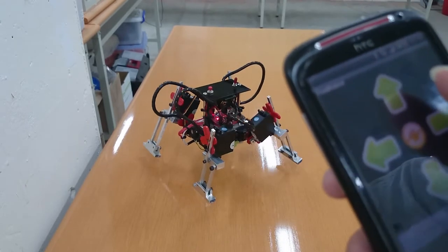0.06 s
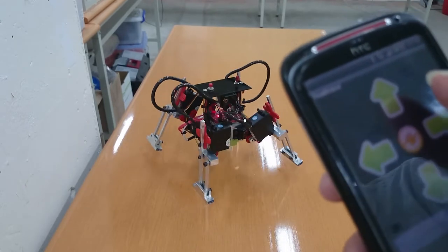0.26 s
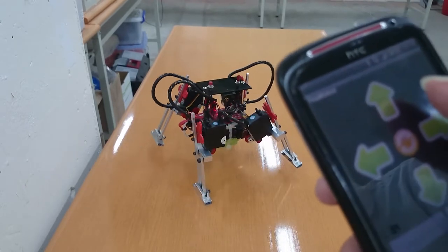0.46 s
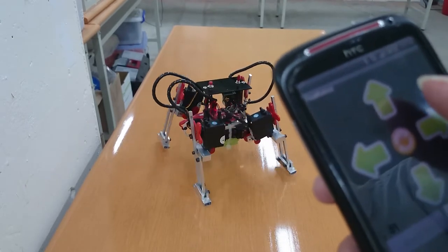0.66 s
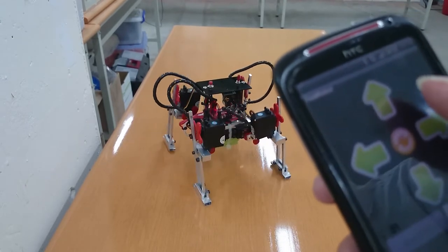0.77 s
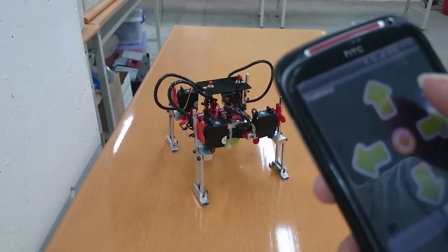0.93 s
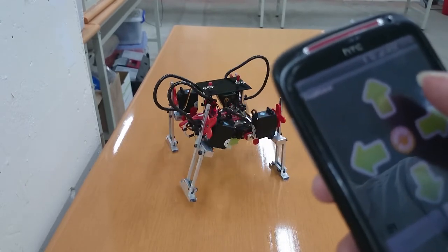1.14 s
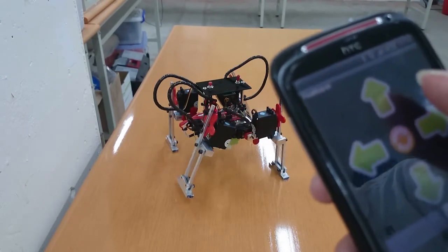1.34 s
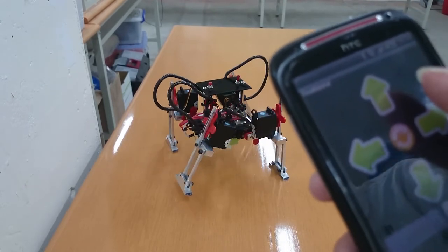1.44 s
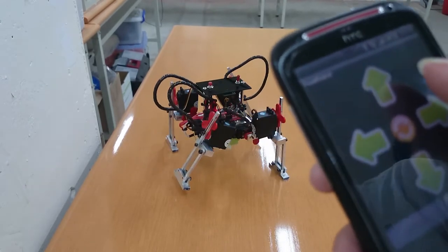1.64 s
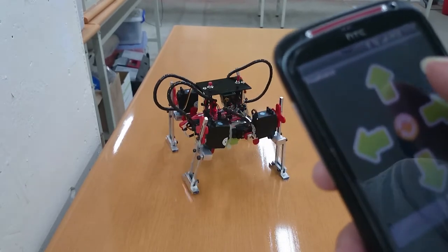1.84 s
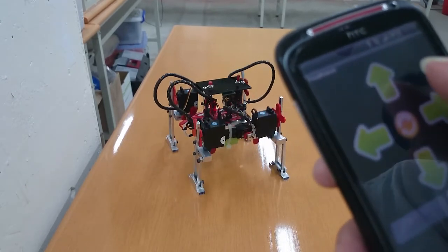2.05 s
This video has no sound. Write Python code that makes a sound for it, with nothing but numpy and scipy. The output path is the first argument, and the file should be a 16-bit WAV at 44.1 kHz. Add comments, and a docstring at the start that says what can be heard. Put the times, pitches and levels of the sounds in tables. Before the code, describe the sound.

Little walking robot's geared servos buzz in bursts, with a sharp foot clack on a tabletop and low air flutter

```python
"""A small walking robot on a tabletop, close by: servo gears rattle in surges, random tooth clicks
pulsed by the drive signal into resonances of body, gears, case and shell. Metal feet knock (noise
bursts and decaying rings) and drag (low noise). Moving air flutters in the right microphone port
(a gliding sine and rumble); a far machine hums under room noise, with a few faint short tones."""
import sys
import numpy as np
from scipy import signal
from scipy.fft import rfft, irfft
from scipy.io import wavfile
from scipy.ndimage import uniform_filter1d

SR = 44100
rng = np.random.default_rng(int(sys.argv[2]) if len(sys.argv) > 2 else 0)


def attenuation_scalar(level_db):
    """Turn a level in dB into a linear amplitude multiplier (20 dB per decade)."""
    decades = np.asarray(level_db, float) / 20
    return 10 ** decades


def unload_wav(signal):
    """Save mono or channel-first audio to the path in sys.argv[1] as 16-bit WAV at rate SR, clipped to [-1, 1]."""
    wavfile.write(
        sys.argv[1],
        SR,
        np.round(np.clip(np.atleast_2d(signal).T, -1, 1) * 32767).astype(np.int16),
    )


N = 92610


def evened(x):
    """Scales each channel to rms 1."""
    return x / np.sqrt(np.mean(x ** 2, -1, keepdims=True) + 1e-20)


def coloured(x, points):
    """Filters by a (Hz, dB) spectrum, interpolated over log frequency."""
    f, db = np.transpose(points)
    hz = np.fft.rfftfreq(x.shape[-1], 1 / SR)
    gain = attenuation_scalar(np.interp(np.log(hz + 1), np.log(f + 1), db))
    return irfft(rfft(x) * gain, x.shape[-1])


def slow(seconds, channels=1):
    """Random drift of rms 1: noise smoothed twice over a window of the given seconds."""
    size = max(int(seconds * SR), 1)
    noise = rng.standard_normal((channels, N))
    return evened(uniform_filter1d(uniform_filter1d(noise, size), size))


def resonate(x, hz, width_hz):
    """A steep resonance around hz, fixed or moving: shift down, smooth twice, shift back."""
    turn = np.exp(2j * np.pi * np.cumsum(hz * np.ones(N)) / SR)
    r = np.exp(-np.pi * width_hz / SR)
    return (turn * signal.lfilter([(1 - r) ** 2], [1, -2 * r, r ** 2], x / turn)).real


def reverb(x, t60_s):
    """Convolves with a decaying noise tail, partly alike in both ears."""
    alike = 0.3
    t = np.arange(SR // 2) / SR
    tail = rng.standard_normal((2, len(t))) * attenuation_scalar(-60 * t / t60_s) * (t > 0.006)
    tail = tail + alike * tail[::-1]
    return signal.fftconvolve(x, tail / np.linalg.norm(tail[0]), axes=1)[:, :N]


def bump(start_s, length_s):
    """A smooth rise and fall: half a sine period."""
    return np.sin(np.pi * np.clip((np.arange(N) / SR - start_s) / length_s, 0, 1))


def room_tone():
    """A far machine's wavering harmonics over broad, partly shared room noise."""
    # Each row: time in seconds, fundamental in Hz.
    hum_pitch = [(0, 41.2), (1.003, 43.49), (2.1, 44.82)]
    # Each row: multiple of the fundamental, mean rms level in dB.
    hum_orders = [(1, -59.5), (2, -57.5), (3, -59.5)]
    # Room noise spectrum. Each row: frequency in Hz, relative level in dB.
    air_colour = [(30, 16), (80, 1), (200, -4), (500, -6), (1000, -11), (2000, -29), (4000, -27.5),
                  (8000, -27), (12000, -41), (16000, -34.5)]
    # Room noise swell. Each row: time in seconds, level in dB relative to air_db.
    air_level = [(0, 11), (0.102, 3), (.5, -1.5), (0.999, 3), (1.55, 1), (1.75, 4), (2.1, 3.5)]
    waver_db, air_db, air_same = 2.5, -55, 0.41

    t = np.arange(N) / SR
    turns = np.cumsum(np.interp(t, *np.transpose(hum_pitch))) / SR
    waver = slow(0.052, channels=len(hum_orders))
    hum = np.zeros(N)
    for (k, db), w in zip(hum_orders, waver):
        hum += np.sqrt(2) * attenuation_scalar(db + waver_db * w) * np.sin(2 * np.pi * k * turns)

    a, b = rng.standard_normal((2, N))
    noise = np.array([a, air_same * a + np.sqrt(1 - air_same ** 2) * b])
    air = evened(coloured(noise, [(12, -1.5)] + air_colour))
    return hum + air * attenuation_scalar(air_db + np.interp(t, *np.transpose(air_level)))


def tones():
    """Faint steady-pitched sines swell and vanish."""
    # Each row: start in seconds, length in seconds, pitch in Hz, rms level at the crest in dB.
    tone_rows = [(0.73, 0.17, 57, -52), (1.69, 0.15, 554, -60), (1.65, .24, 720, -65),
                 (1.85, 0.077, 425, -59), (1.96, 0.085, 372, -59)]
    t = np.arange(N) / SR
    out = np.zeros(N)
    for start_s, length_s, hz, db in tone_rows:
        out += np.sqrt(2) * attenuation_scalar(db) * bump(start_s, length_s) * np.sin(2 * np.pi * hz * t)
    return out


def flutter():
    """Air at the right port: a deep gliding sine, with a lumpy rumble that follows its level."""
    # Each row: time in seconds, wobble pitch in Hz, relative level in dB.
    wobble_path = [(0.0, 21.5, -44.5), (0.152, 16.2, -36.5), (0.29, 21.7, -18), (0.478, 15.5, -30),
                   (0.539, 19.2, -27.5), (0.6, 26.2, -21.5), (0.642, 19.87, -22), (0.862, 22.2, -15.5),
                   (0.921, 22.2, -15.5), (1.091, 20.5, -27.5), (1.171, 18.5, -26.5), (1.3, 21.2, -36.5),
                   (1.359, 23.5, -21.5), (1.398, 22.8, -24.5), (1.442, 20.1, -41.5), (1.481, 20.6, -29),
                   (1.599, 16.3, -32), (1.651, 21.2, -47.5), (1.7, 22, -36), (1.869, 22.3, -35.5),
                   (1.95, 31, -47.5), (2.1, 23, -44.5)]
    # Rumble spectrum. Each row: frequency in Hz, relative level in dB.
    gust_colour = [(25, -0.5), (50, 3.5), (100, -7.5), (200, -13.5), (400, -26.5), (800, -34), (1300, -48),
                   (2000, -144)]
    wobble_db, wobble_left_db = 7.5, -46
    gust_db, gust_left_db, gust_follow, gust_lump_db = -19, -12.5, 0.79, 0.67

    s, hz, db = np.transpose(wobble_path)
    t = np.arange(N) / SR
    db = np.interp(t, s, db)
    phase = 2 * np.pi * np.cumsum(np.interp(t, s, hz)) / SR
    wobble = np.sqrt(2) * np.sin(phase) * attenuation_scalar(db + wobble_db)
    gust = evened(coloured(rng.standard_normal((2, N)), [(4.4, -24)] + gust_colour))
    gust *= attenuation_scalar(gust_follow * db + gust_db + gust_lump_db * slow(0.0077, channels=2))
    return wobble * attenuation_scalar([[wobble_left_db], [0]]) + gust * attenuation_scalar([[gust_left_db], [0]])


def drags():
    """Feet slide on the table: low noise in bumps, with a lumpy level."""
    # Each row: start in seconds, length in seconds, level in dB before the lumps.
    drag_rows = [(.22, 0.088, -53.5), (0.54, 0.17, -53), (0.685, 0.15, -55), (0.879, 0.095, -52.5)]
    # Each row: frequency in Hz, relative level in dB.
    drag_colour = [(80, -10.5), (250, 6), (600, 0), (1250, -3), (1600, -46.5)]
    level = sum(attenuation_scalar(db) * np.sqrt(abs(bump(s, length_s))) for s, length_s, db in drag_rows)
    a, b = rng.standard_normal((2, N))
    rumble = evened(coloured(np.array([a, a + 1.2 * b]), drag_colour))
    return rumble * level * attenuation_scalar(2.9 * slow(0.024))


def feet():
    """Each knock is a dull thud and a short clack, with decaying rings of table and metal foot."""
    # Each row: time in seconds, relative level of table, of metal tick in dB.
    knocks = [(0.249, -59.5, -63), (0.739, -48.5, -73), (1.249, -38.5, -43.5), (1.254, -40, -46),
              (1.2703, -40, -35), (1.275, -38.5, -58), (1.31, -47, -67.5)]
    # Each row: nominal frequency in Hz, relative left level, right level in dB, T60 in seconds.
    table_modes = [(151.6, -1.5, -6, 0.22), (207.2, -8.5, 0.5, 0.22), (377.2, -7.5, -11.5, 0.15),
                   (518, 1, -7, 0.088), (796, -8, -8.5, 0.04), (1165, -6.5, -6.5, 0.085)]
    foot_modes = [(3820, 4.5, -15.5, 0.041), (4320, -22, 1.5, 0.012), (10850, -5, -14, 0.0061)]  # same columns
    # Noise spectra. Each row: frequency in Hz, relative level in dB.
    thud_colour = [(60, -13.5), (150, 3.5), (350, -5.5), (800, -1.5), (1300, -8.5), (2500, -13),
                   (4000, -24)]
    clack_colour = [(1000, -31.5), (2500, -6.5), (4500, -6), (11000, -6.5), (16000, -30.5)]
    thud_db, thud_t60_s, thud_rise_s = 8.5, 0.032, 0.0023
    clack_db, clack_t60_s, clack_right_db = 7.5, 0.011, -20.5
    drop, drop_s = 0.5, 0.0017  # metal rings start sharp by this share, fall with this time constant

    t = np.arange(SR // 4) / SR
    out = np.zeros((2, N + SR))
    chance = rng.random((len(knocks), 2 * len(table_modes + foot_modes)))
    bursts = rng.standard_normal((len(knocks), 2, len(t)))
    for (s, table_db, tick_db), draw, (low, high) in zip(knocks, chance, bursts):
        part = out[:, round(s * SR):][:, :len(t)]  # a view: adding here fills out
        thud = evened(coloured(low, thud_colour)) * attenuation_scalar(table_db + thud_db - 60 * t / thud_t60_s)
        part += thud * np.minimum(t / thud_rise_s, 1)
        clack = evened(coloured(high, clack_colour)) * attenuation_scalar(tick_db + clack_db - 60 * t / clack_t60_s)
        part += clack * attenuation_scalar([[0], [clack_right_db]])
        rows = [(table_db, *m) for m in table_modes] + [(tick_db, *m) for m in foot_modes]
        for k, (db, hz, left_db, right_db, t60_s) in enumerate(rows):
            is_metal = k >= len(table_modes)
            bent_s = t + is_metal * drop * drop_s * (1 - np.exp(-t / drop_s))
            cycles = hz * (0.97 + 0.063 * draw[2 * k]) * bent_s + draw[2 * k + 1]
            ring = np.sin(2 * np.pi * cycles) * attenuation_scalar(db - 60 * t / t60_s)
            attack = np.minimum(t * hz / 3.7, 1)  # 3.7 nominal cycles
            part += ring * attack * attenuation_scalar([[left_db], [right_db]])
    return out[:, :N]


def gear_teeth():
    """Dense random clicks of either sign plus hiss, partly shared by the two channels."""
    teeth_per_s, spread_db, hiss_db, shared = 2900, 0.5, -5.5, 0.55
    hit = rng.random((3, N)) < teeth_per_s / SR
    clicks = hit * attenuation_scalar(spread_db * np.minimum(rng.exponential(1, (3, N)), 5))
    clicks = evened(clicks * rng.choice([-1., 1.], (3, N)))
    teeth = clicks + attenuation_scalar(hiss_db) * rng.standard_normal((3, N))
    return shared * teeth[2] + np.sqrt(1 - shared ** 2) * teeth[:2]


def servos():
    """Gear teeth, pushed some fifty times a second in surges, excite the resonances of the servos."""
    # Each row: start, end in seconds, case pitch shift in percent, swell in dB (from minus to plus
    # this), relative level of body, gear, case, shell, top band in dB, right relative to left in dB.
    surges = [(0.157, 0.215, .1, 5.8, -70, -72, -72.5, -67, -70, -2),
              (0.204, 0.473, 0.9, 0.5, -63, -52, -43.5, -48.5, -54.5, -4.5),
              (0.484, 0.556, 5.5, 5.5, -62.5, -59.5, -69.5, -60.5, -64, -4.5),
              (0.543, 0.834, 3, -1.5, -66, -50, -47.5, -45.5, -64, -4),
              (0.831, 0.972, 1.5, 0.5, -104, -54.5, -45.5, -42, -71, 1),
              (1.009, 1.277, -0.8, -1.4, -72.5, -64.5, -51, -52.5, -53, -0.5),
              (1.262, 1.375, -1, 0.7, -58, -68.5, -59, -59.5, -61, 7.5),
              (1.359, 1.604, -6, -0.1, -57, -58, -52, -45.5, -53.5, 0.7),
              (1.622, 2.204, -1.2, -0.8, -72, -66, -52, -53, -59, -0.5)]
    # One per surge: time offset of the drive pushes in seconds.
    drive_lag_s = [0.0078, 0.00013, 0.037, -0.015, -0.0036, -0.0065, -0.039, -0.012, -0.02]
    # One per band: share that pulses with the drive.
    depths = [0.08, 0.16, 0.42, 0.37, 0.73]
    # Each row: frequency in Hz, width of each smoothing stage in Hz, relative left, right level in dB.
    body_modes = [(470, 790, -3, -9), (2170, 3400, -12, -2.5), (3260, 500, -3, -8),
                  (4170, 1070, -0.8, -5.5)]
    gear_modes = [(5076, 3070, -2.5, 3), (5706, 1260, 3, 9), (6180, 1270, -6.5, 2)]  # these four: same columns
    case_modes = [(7310, 890, 1, -8.5), (8046, 540, 0, -18)]
    shell_modes = [(9140, 3540, -2, -12)]
    top_modes = [(11260, 1500, 2, -17.5), (14840, 660, -8.5, -16)]
    # Short bright rasps of a gear. Each row: start, length in seconds, relative level in dB.
    rasps = [(0.929, 0.0036, -51.5), (1.037, 0.0054, -48), (1.395, 0.0072, -38), (1.473, 0.0096, -39)]
    rise_s, fall_s, drive_hz, drive_sharp, lump_db = 0.027, 0.0068, 50.52, 2.43, 2.5

    t = np.arange(N) / SR
    teeth = gear_teeth()
    out = np.zeros((2, N))
    which = np.searchsorted([row[0] for row in surges[1:]], t)
    case_shift = np.array([row[2] for row in surges])[which] / 100
    bands = (body_modes, gear_modes, case_modes, shell_modes, top_modes)
    for band, modes in enumerate(bands):
        level = np.zeros((2, N))
        for (start, end, _, swell_db, *db, right_db), lag_s in zip(surges, drive_lag_s):
            push = np.exp(drive_sharp * (np.cos(2 * np.pi * drive_hz * (t - lag_s)) - 1))
            on = np.clip(np.minimum((t - start) / rise_s, (end - t) / fall_s + 1), 0, 1) ** 2
            on *= attenuation_scalar(swell_db * np.clip(2 * (t - start) / (end - start) - 1, -1, 1))
            pulsed = 1 - depths[band] + depths[band] * 2 * push
            level += on * pulsed * attenuation_scalar([[db[band]], [db[band] + right_db]])
        if modes is top_modes:
            for s, length_s, rasp_db in rasps:
                level += attenuation_scalar(rasp_db) * np.exp(-((t - s) / length_s * 2 - 1) ** 2 * 2)
        shift = 1 + (modes is case_modes) * case_shift
        drive = teeth * attenuation_scalar(lump_db * slow(0.0063)) * level
        for k, (hz, width_hz, *sides_db) in enumerate(modes):
            ring = resonate(drive, hz * shift, width_hz) * np.sqrt(SR / width_hz)
            out += (-1) ** k * ring * attenuation_scalar(sides_db)[:, None]
    return out


def scene():
    """Servos and knocks with their room echoes, plus the other layers."""
    # Knock echo colour. Each row: frequency in Hz, relative level in dB.
    knock_tail = [(100, 3), (300, 2.5), (800, -5), (2500, 0), (9000, -8)]
    whir, knock = servos(), feet()
    whir = whir + attenuation_scalar(-2) * reverb(whir, t60_s=0.28)
    whir[0] = np.roll(whir[0], -15)  # left leads, in samples
    knock = knock + attenuation_scalar(-3) * coloured(reverb(knock, t60_s=0.3), knock_tail)
    knock[0] = np.roll(knock[0], -8)
    return whir + knock + drags() + flutter() + room_tone() + tones()


def roll_off(x):
    """The treble ends steeply here."""
    return signal.sosfilt(signal.butter(12, 16500, fs=SR, output="sos"), x)


def record(dry):
    """Mids and top sink while a high level, as of strong bass, loads the recorder; gap and band limit."""
    sink_from_db, sink_db_per_db, sink_s = -16.5, 13.5, 0.15
    gap_hz, gap_half_width_hz, gap_db, edge_hz = 13200, 750, -40, 15800

    hz = np.fft.rfftfreq(N, 1 / SR)
    power = uniform_filter1d((dry ** 2).mean(0), round(sink_s * SR))
    load_db = 10 * np.log10(abs(power) + 1e-12)
    sinking = (hz > 1200) & (hz < 3900) | (hz > 11980)
    mids_and_top = irfft(rfft(dry) * sinking, N)
    sink_gain = attenuation_scalar(-sink_db_per_db * np.maximum(load_db - sink_from_db, 0))
    sunk = dry - mids_and_top * (1 - sink_gain)
    gap = attenuation_scalar(gap_db * np.exp(-((hz - gap_hz) / gap_half_width_hz) ** 4))
    return roll_off(irfft(rfft(sunk) * gap * (hz < edge_hz), N))


dry = scene()
out = record(dry)
unload_wav(out)
```